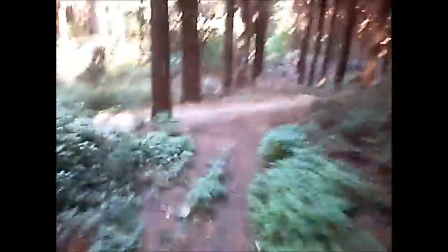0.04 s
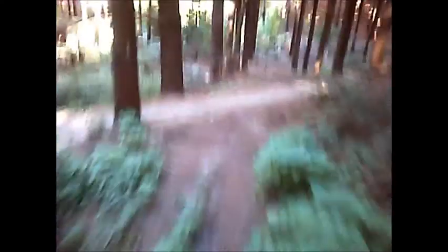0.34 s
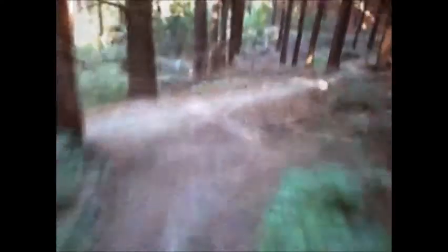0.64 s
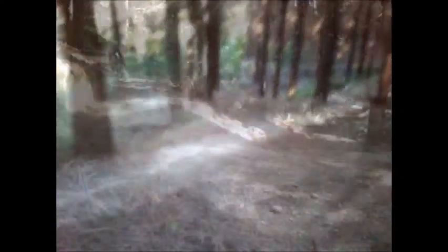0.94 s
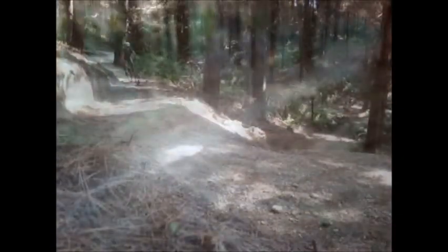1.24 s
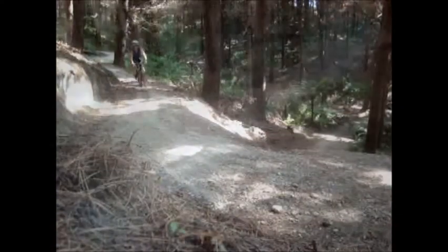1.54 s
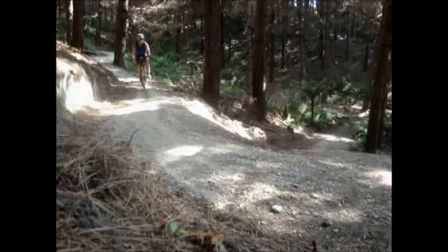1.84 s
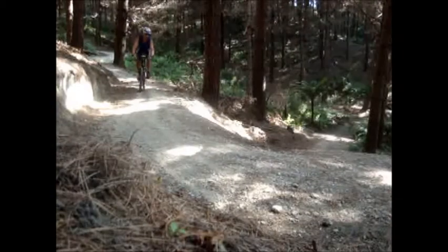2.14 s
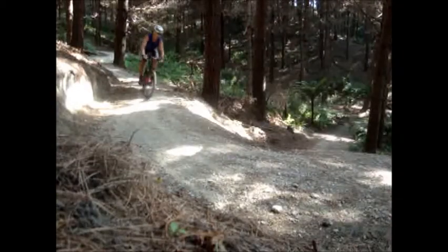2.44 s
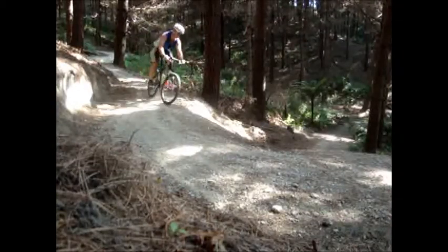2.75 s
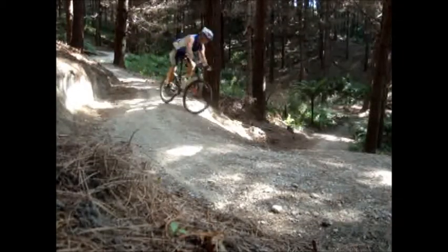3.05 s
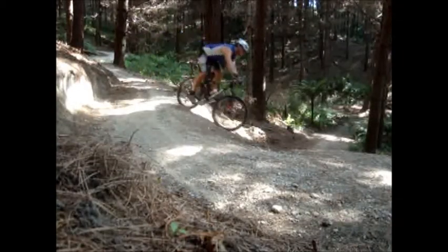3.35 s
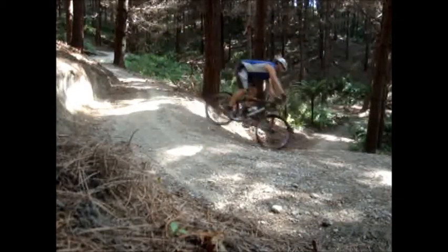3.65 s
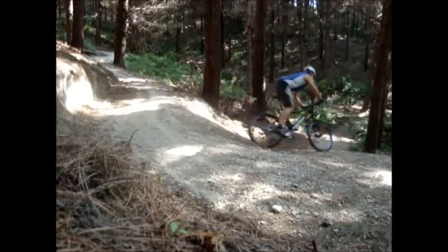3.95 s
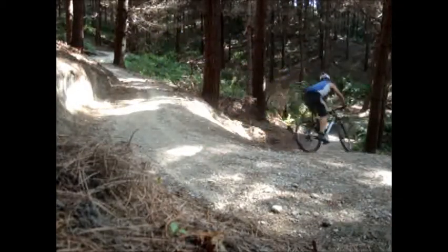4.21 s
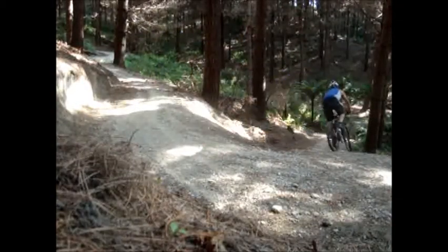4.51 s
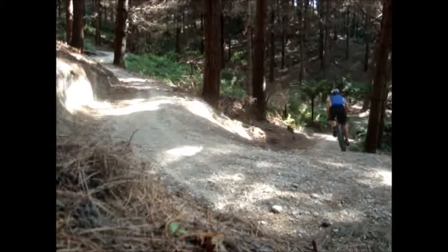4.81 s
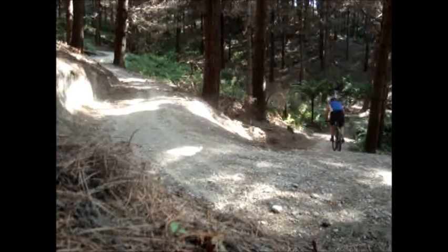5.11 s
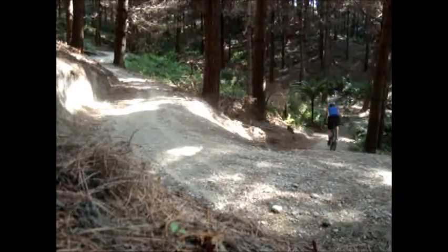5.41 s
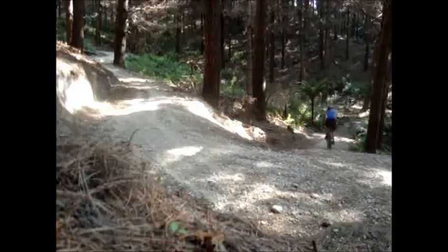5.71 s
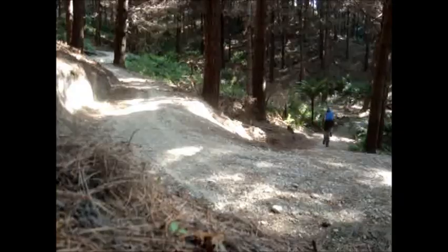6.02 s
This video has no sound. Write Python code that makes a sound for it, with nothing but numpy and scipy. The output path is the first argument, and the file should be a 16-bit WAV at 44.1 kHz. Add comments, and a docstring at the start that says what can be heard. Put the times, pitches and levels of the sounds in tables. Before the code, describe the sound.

Over a constant high hiss and quiet forest air, bike tyres come nearer on loose gravel, crunching and popping stones. The bike hops a hump and comes down close by in a burst of grit, ringing hollowly. Then it knocks hard once and rattles over smaller bumps as the rolling grows duller, with faint echoes from the trees.

```python
"""A mountain bike comes down a gravel forest trail, hops a hump, lands in a bend close by and rolls away.
Grit drums on the tyre casings and crunches under them, the tread hums and single stones snap out.
The frame rings hollow on landing, then knocks and clatters over bumps as the bike leaves.
Trunks scatter the sound; a soft forest hush and the recorder's bright hiss lie under it."""
import sys
import numpy as np
from scipy import signal
from scipy.fft import rfft, irfft, next_fast_len
from scipy.io import wavfile

SR = 44100
rng = np.random.default_rng(int(sys.argv[2]) if len(sys.argv) > 2 else 0)


def generate_wav(sig):
    """Save sig (samples, or channels by samples) to the path in sys.argv[1] as 16-bit PCM at SR."""
    pcm = np.round(np.clip(np.atleast_2d(sig).T, -1, 1) * 32767).astype(np.int16)
    wavfile.write(sys.argv[1], SR, pcm)


N = 267731
TIME = np.arange(N) / SR


def from_db(db):
    """Decibels to gain."""
    return 10 ** (np.asarray(db) / 20)


def rms_one(x):
    """Scale to an rms of 1."""
    return x / np.sqrt(np.mean(x ** 2) + 1e-20)


def at_hz(points, hz):
    """Read a spectrum on a log-frequency axis."""
    knots, level = np.transpose(points)
    return np.interp(np.log(np.maximum(hz, 1)), np.log(knots), level)


def band(x, low_hz, high_hz):
    """Butterworth band-pass."""
    return signal.sosfilt(signal.butter(2, [low_hz, high_hz], "band", fs=SR, output="sos"), x + 1e-18)


def resonate(x, hz, width_hz):
    """One resonance with unity gain at its peak."""
    r = np.exp(-np.pi * width_hz / SR)
    feedback = [1, -2 * r * np.cos(2 * np.pi * hz / SR), r * r]
    return signal.lfilter(np.array([1, 0, -1]) * (1 - r * r) / 2, feedback, x + 1e-18)


def steady_noise(spectrum):
    """A smooth noise bed of the given colour; rms 1."""
    size = 2 * next_fast_len(N // 2 + 1)
    colour = from_db(at_hz(spectrum, np.fft.rfftfreq(size, 1 / SR)))
    return rms_one(irfft(rfft(rng.standard_normal(size)) * colour)[:N])


def drone(hz, width_hz):
    """A resonance kept going by the jolts of the trail; rms 1."""
    return rms_one(resonate(resonate(rng.standard_normal(N), hz, width_hz), hz, width_hz))


def drift(rate_hz, hop=40):
    """A slow random modulator with a spread of 1, drawn every hop samples."""
    r = np.exp(-2 * np.pi * rate_hz * hop / SR)
    draws = rng.standard_normal((N + SR) // hop + 2)
    slow = signal.lfilter([1], [1, -2 * r, r * r], draws)[SR // hop:]
    return np.interp(np.arange(N) / hop, np.arange(len(slow)), rms_one(slow))


def grit(per_s, size_db, clump_db):
    """Clicks of many small and a few large grains, arriving in clumps."""
    born = rng.random(N) < per_s * from_db(clump_db * drift(rate_hz=22)) / SR
    sizes = from_db(size_db * np.minimum(rng.exponential(1, N), 4))
    return born * sizes * rng.choice([-1, 1], N)


def body(clicks, modes):
    """Clicks ring a body's broad resonances, mixed in alternating polarity; rms 1."""
    return rms_one(sum((-1) ** k * from_db(db) * resonate(clicks, hz, width)
                       for k, (hz, width, db) in enumerate(modes)))


def swell(s, half_s):
    """A bell-shaped envelope around time s, height 1."""
    return np.exp(-.5 * np.minimum(np.abs(TIME - s) / half_s, 20) ** 2)


def surge(s, rise_s, fall_s):
    """An envelope that grows up to time s, then dies away; height 1."""
    return np.exp(-np.maximum((s - TIME) / rise_s, (TIME - s) / fall_s))


def add(out, s, sound):
    """Mix a sound in from time s on."""
    at = int(s * SR)
    out[at:at + len(sound)] += sound[:len(out) - at]


# Colour of the still forest: (frequency [Hz], relative density [dB])
HUSH_SPECTRUM = [(20, -24), (50, -19), (100, -9), (180, -4), (300, -2.5), (900, -1), (1500, -7.5),
                 (3000, -11.5), (4500, -9), (10000, -22)]
def forest_hush(level_db=-50.5):
    """The still forest lays a soft, steady bed under the bike."""
    return from_db(level_db) * steady_noise(HUSH_SPECTRUM)


# Colour of the recorder's hiss: (frequency [Hz], relative density [dB])
HISS_SPECTRUM = [(3500, -40.5), (4500, -18.5), (4850, -8), (5150, -2), (5600, 2.5), (6500, 2.5), (7200, 3),
                 (8000, -0.5), (9000, -7.5), (10000, -15), (11000, -40.5)]
def recorder_hiss(level_db=-42.5):
    """The recorder's own noise is a bright, steady band of treble."""
    return from_db(level_db) * steady_noise(HISS_SPECTRUM)


# Fader curve of the tread hum: (time [s], level [dB])
HUM_LEVELS = [(.6, -65.5), (1.3, -58.5), (1.85, -57), (2.25, -65), (2.75, -62.5), (3.2, -76), (3.75, -51),
              (4.1, -75)]
def tread_hum():
    """The knobbly tread hums on firm ground."""
    return from_db(np.interp(TIME, *np.transpose(HUM_LEVELS))) * drone(hz=294, width_hz=40)


# Resonances of the tyre casing: (frequency [Hz], width [Hz], gain [dB])
CASING_MODES = [(855, 235, -1.5), (987, 164, 3.5), (1230, 258, 2), (1371, 230, 0)]
def casing_drum():
    """Grit drums on the tyre casing, a grainy midrange; rms 1."""
    clicks = grit(per_s=2200, size_db=4.0, clump_db=3.5)
    return rms_one(band(body(clicks, CASING_MODES), 666, 1900))


# Colour of crushed gravel: (frequency [Hz], gain [dB])
GRAVEL_SPECTRUM = [(1450, -2), (1700, -2), (2200, -1), (2700, -3), (3400, -7.5), (4200, -11), (6000, -15.5)]
def gravel_crunch(damping=0.22, count=14):
    """Every crushed grain cracks for a few cycles at one of count pitches; rms 1."""
    clicks = grit(per_s=3000, size_db=2.5, clump_db=4.0)
    pitches = np.geomspace(GRAVEL_SPECTRUM[0][0], GRAVEL_SPECTRUM[-1][0], count)
    dealt = rng.integers(0, count, N)
    cracks = sum(from_db(at_hz(GRAVEL_SPECTRUM, hz)) * resonate(clicks * (dealt == k), hz, damping * hz)
                 for k, hz in enumerate(pitches))
    return rms_one(band(cracks, 600, 4400))


# Resonances of the ground and the air in the tyres: (frequency [Hz], width [Hz], gain [dB])
RUMBLE_MODES = [(192, 56, -6), (301.5, 61, -2.5), (442, 138, -2.5), (502, 46, 1.5), (663, 130, -4.5)]
def ground_rumble():
    """The ground rumbles under the wheels; rms 1."""
    clicks = grit(per_s=1500, size_db=2.5, clump_db=2.0)
    return rms_one(band(body(clicks, RUMBLE_MODES), 110, 1000))


# How hard the tyres work the gravel: (time [s], level [dB])
TYRE_WORK = [(0.66, -68), (0.7, -57), (0.72, -54.5), (0.99, -50), (1.5, -49), (1.89, -45.5), (2.12, -49.5),
             (2.34, -49.5), (2.57, -45), (3.41, -44.5), (3.6, -37), (3.74, -37), (3.9, -46.5),
             (4.47, -49.5), (4.94, -46.5), (6.05, -49)]
# The wheels skip clear of the ground: (time [s])
SKIP_TIMES = [1.635, 2.89, 3.225, 3.345, 3.49]
def rolling_gain(coming_db, going_db, pass_s=3.3, crossfade_s=.35, skip_db=-7):
    """The rolling follows the tyres' work, ducks at each skip and changes trim as the bike passes."""
    ducking_db = skip_db * sum(swell(s, half_s=0.012) for s in SKIP_TIMES)
    work_db = np.interp(TIME, *np.transpose(TYRE_WORK)) + ducking_db
    gone = .5 + .5 * np.tanh((TIME - pass_s) / crossfade_s)
    return from_db(work_db + coming_db * (1 - gone) + going_db * gone)


# A tyre bites into loose gravel: (time [s], drum level [dB], half length [s], crunch over drum [dB])
TYRE_BITES = [(.82, -51, .015, 3), (0.959, -51.5, 0.013, 6), (1.234, -47.5, 0.019, -9),
              (1.55, -46.5, 0.021, -12), (1.782, -48, .025, -6), (1.987, -41.5, .005, -7),
              (2.383, -42.5, 0.0082, -1), (2.429, -42.5, 0.0056, -3), (2.703, -43, .008, -8),
              (2.999, -38, 0.017, -3.5), (3.403, -40, 0.019, -3.5), (3.457, -38.5, 0.0071, 3.5),
              (3.559, -36, 0.022, 2.5), (3.621, -31.5, 0.01, 1), (3.694, -33.5, 0.019, 1.5),
              (3.849, -45, 0.023, 5.5), (4.853, -44, 0.0076, 0)]
def tyres(bite_rumble_db=-14):
    """Drum, crunch and rumble swell at each bite; the casing leads coming, the gravel going."""
    drum_power = rolling_gain(coming_db=-3.5, going_db=-7.5) ** 2
    crunch_power = rolling_gain(coming_db=-4, going_db=-2.5) ** 2
    rumble_power = rolling_gain(coming_db=-10, going_db=-8.5) ** 2
    for s, level_db, half_s, crunch_db in TYRE_BITES:
        bite_power = from_db(level_db) ** 2 * swell(s, half_s)
        drum_power += bite_power
        crunch_power += bite_power * from_db(crunch_db) ** 2
        rumble_power += bite_power * from_db(bite_rumble_db) ** 2
    drum = np.sqrt(drum_power) * casing_drum()
    crunch = np.sqrt(crunch_power) * behind_trees(gravel_crunch())
    rumble = np.sqrt(rumble_power) * ground_rumble()
    return drum + crunch + rumble


def forest_echoes(x, level_db=-14, t60_s=0.68, count=160):
    """Many faint, dull echoes come back from the ground and the trunks."""
    echoes = np.zeros(SR // 2)
    delays_s = rng.uniform(.004, .45, count)
    echoes[(delays_s * SR).astype(int)] = rng.choice([-1, 1], count) * from_db(-60 * delays_s / t60_s)
    wet = signal.fftconvolve(x, echoes / np.linalg.norm(echoes))[:N]
    return from_db(level_db) * band(wet, 170, 3200)


def pebbles(per_s=2.4, over_work_db=12, centre_hz=1600):
    """Small stones fly at random, as hard as the tyres work: (time [s], strength [dB], pitch [Hz])."""
    when, pitch = rng.random((int(per_s * N / SR), 2)).T
    s = when * TIME[-1]
    strength_db = np.interp(s, *np.transpose(TYRE_WORK)) + over_work_db
    return list(zip(s, strength_db, centre_hz * 2 ** (pitch - .5)))


# Larger stones snap from under the tread: (time [s], strength [dB], pitch [Hz])
LARGE_STONES = [(0.801, -30, 1800), (0.889, -34, 1600), (0.908, -31.5, 990), (1.232, -28, 1405),
                (1.539, -29.5, 1280), (1.673, -27, 1600), (1.929, -32.5, 915), (2.05, -28.5, 935),
                (2.346, -27.5, 1100), (2.418, -29.5, 1290), (2.566, -31.5, 1300), (2.936, -20, 1280),
                (2.97, -25, 1270), (3.027, -24, 1230), (3.157, -29.5, 2200), (3.396, -25, 1020),
                (3.41, -22, 2610), (3.453, -25, 880), (3.561, -15.5, 2570), (3.564, -14.5, 2280),
                (3.613, -17, 2000), (3.702, -25, 1500), (3.876, -28.5, 2050), (4.267, -30, 2000),
                (4.383, -28.5, 2100), (4.844, -28.5, 2300), (4.88, -27, 2300)]
def stone_snaps(trim_db=1.5, damping=0.57, spray_db=-23.5, spray_s=0.0055, top_hz=4200):
    """A stone lets go with one short snap at its own pitch, and throws a little grit after it."""
    out, t = np.zeros(N), TIME[:SR // 10]
    lowpass = signal.butter(5, top_hz, fs=SR, output="sos")
    for s, strength_db, hz in LARGE_STONES + pebbles():
        push = from_db(spray_db) * rng.standard_normal(len(t)) * np.exp(-t / spray_s)
        push[0] = 1   # the transient ahead of the spray
        snap = signal.sosfilt(lowpass, band(resonate(push, hz, damping * hz), 590, 6700))
        add(out, s, from_db(trim_db + strength_db) * snap / np.abs(snap).max())
    return out


def tread_scrub(level_db=-43):
    """The tread scrubs on the lip of the hump."""
    return from_db(level_db) * surge(2.702, rise_s=.012, fall_s=0.041) * drone(hz=1500, width_hz=460)


# Low bumps: (time [s], level [dB], half length [s], pitch [Hz])
LOW_BUMPS = [(3.415, -43, 0.015, 450), (3.72, -44.5, 0.015, 480), (4.73, -50, .012, 300),
             (5.0, -65, .035, 80), (5.058, -50.5, .005, 200)]
def low_bumps():
    """Short swells of low noise, heard as soft thuds."""
    out = np.zeros(N)
    for s, level_db, half_s, hz in LOW_BUMPS:
        noise = rms_one(band(rng.standard_normal(N), hz / 2, hz * np.sqrt(2)))
        out += from_db(level_db) * np.sqrt(swell(s, half_s)) * noise
    return out


def frame_ring(level_db=-43):
    """The frame rings hollow under the load of the landing."""
    return from_db(level_db) * surge(3.7, rise_s=.09, fall_s=0.12) * drone(hz=508, width_hz=45)


# What the struck bike rings with: (frequency [Hz], gain [dB], decay to -60 dB [s])
KNOCK_MODES = [(339, -25, .19), (506, -23, .26), (700, -6.5, .015), (950, -8, .008), (1280, -12, .022),
               (1700, -12, .016), (2150, -12, .012), (2820, -11, .007), (4050, -19, .004)]
# Every knock rebounds: (delay [s], level against the knock [dB])
KNOCK_REBOUNDS = [(.0037, -13), (.0092, -10.5)]
# The bike knocks over bumps: (time [s], strength [dB], contact brightness [Hz])
KNOCK_HITS = [(3.9092, -24, 3500), (4.717, -26.5, 3000), (5.1210, -8.5, 5200), (5.168, -25, 4500),
              (5.255, -24, 3500), (5.396, -28, 1500), (5.42, -27, 2500), (5.442, -18.5, 2900),
              (5.6743, -26.5, 2200), (5.738, -28.5, 2500), (5.7539, -28.5, 1300), (5.973, -26.5, 1420)]
def bike_knocks(low_cut_hz=508, shake=0.67):
    """Each bump strikes the bike's modes and rebounds, and loose parts clatter briefly after it."""
    out, t = np.zeros(N), TIME[:SR // 3]
    hz, mode_db, t60 = np.transpose(KNOCK_MODES)[:, :, None]
    rings = from_db(mode_db - 60 * t / t60) * np.sin(2 * np.pi * hz * t)
    long_ringing = t60[:, 0] > t60.mean()
    hardest_db = max(row[1] for row in KNOCK_HITS)
    for s, strength_db, contact_hz in KNOCK_HITS:
        relative_db = strength_db - hardest_db
        # harder knocks leave the parts rattling louder and for longer
        clatter_db = -39 + 0.34 * relative_db
        clatter_s = max(0.077 + .0027 * relative_db, 1 / SR)
        rattle = rms_one(band(rng.standard_normal(len(t)), 700, 2100))
        knock = from_db(clatter_db) * rattle * np.exp(-t / clatter_s)
        for after_s, loss_db in [(0, 0), *KNOCK_REBOUNDS]:
            # only a heavy blow shakes the whole frame into its long, hollow ring
            frame_db = shake * (relative_db + loss_db) * long_ringing
            scatter_db = rng.normal(0, 0.56, len(rings))
            add(knock, after_s, from_db(strength_db + loss_db + frame_db + scatter_db) @ rings)
        add(out, s, band(knock, low_cut_hz, contact_hz))   # thin tubes radiate little bass
    return out


def behind_trees(x, from_s=4.64, treble_db_per_s=-11, corner_hz=2600):
    """Beyond the bend the trees shade off more and more treble."""
    dull = signal.sosfilt(signal.butter(1, corner_hz, fs=SR, output="sos"), x)
    return dull + (x - dull) * from_db(treble_db_per_s * np.maximum(TIME - from_s, 0))


def scene():
    """The bike and its echoes among the trees, over the forest's hush; mono."""
    bike = tread_hum() + frame_ring() + tread_scrub() + tyres() + bike_knocks() + stone_snaps()
    return (bike + forest_echoes(bike) + low_bumps() + forest_hush())[None]


def record(dry):
    """The recorder adds its hiss, opens after a moment of silence and cuts the top."""
    start_s, cutoff_hz = .533, 10000
    live = (dry + recorder_hiss()) * (TIME >= start_s)
    return signal.sosfilt(signal.ellip(12, .1, 80, cutoff_hz, fs=SR, output="sos"), live)


dry = scene()
out = record(dry)
generate_wav(out)
```